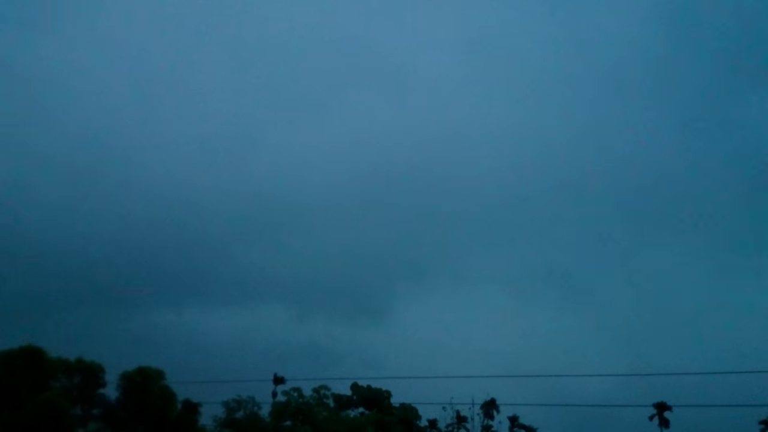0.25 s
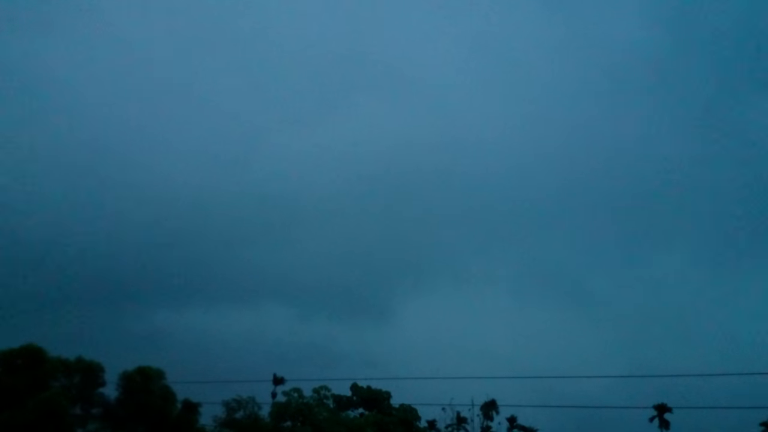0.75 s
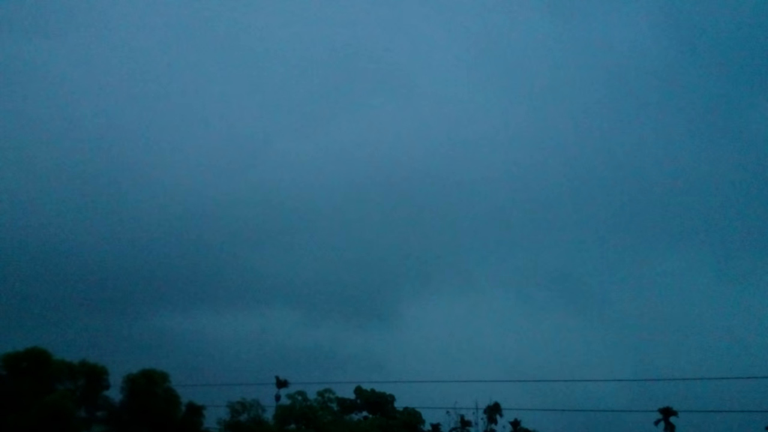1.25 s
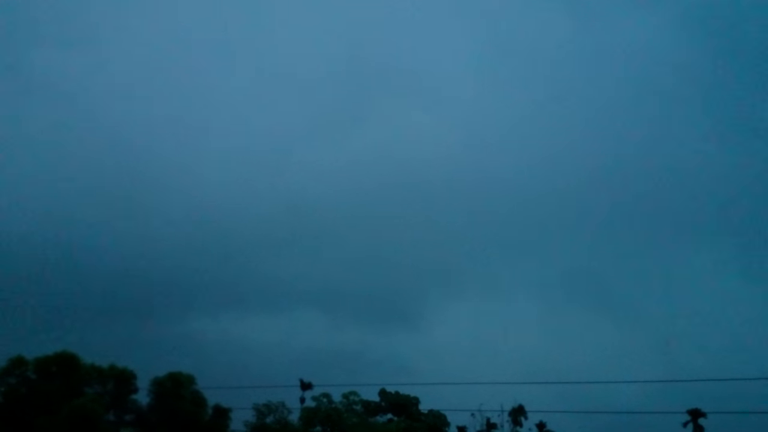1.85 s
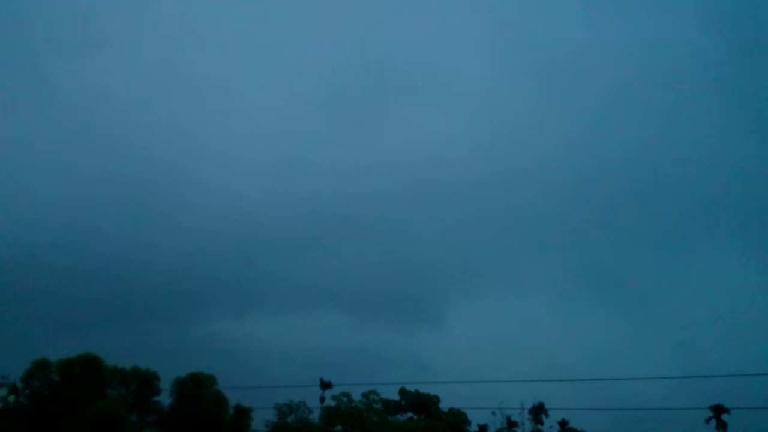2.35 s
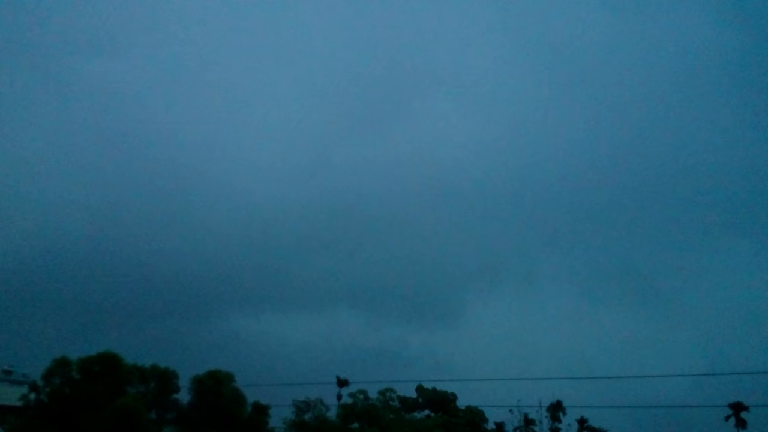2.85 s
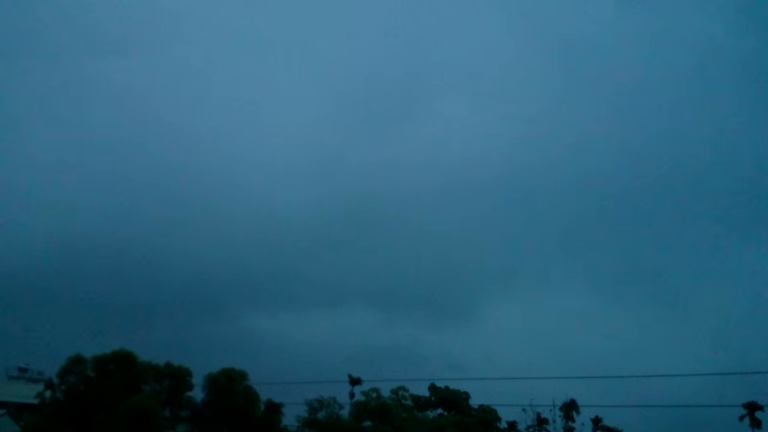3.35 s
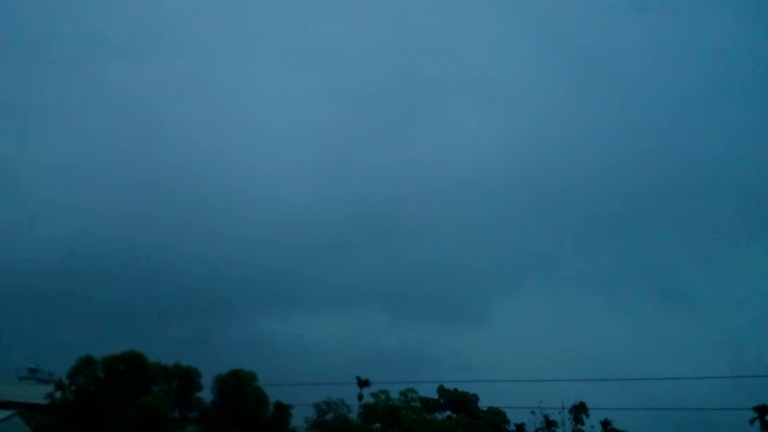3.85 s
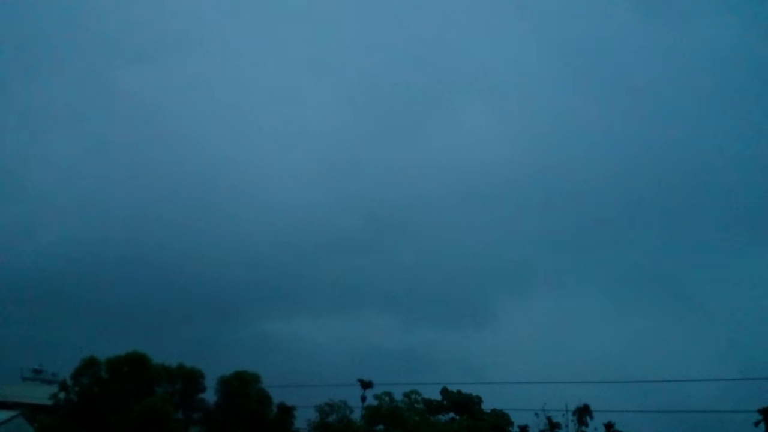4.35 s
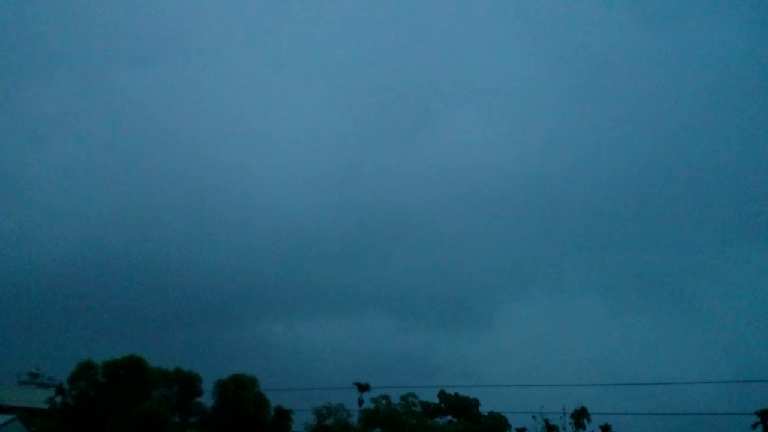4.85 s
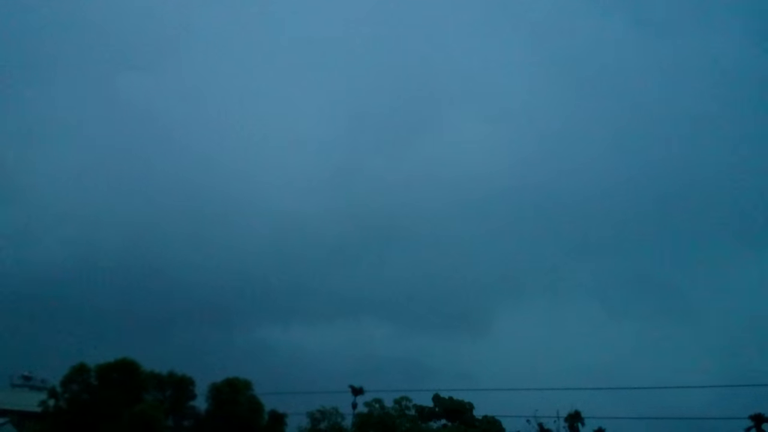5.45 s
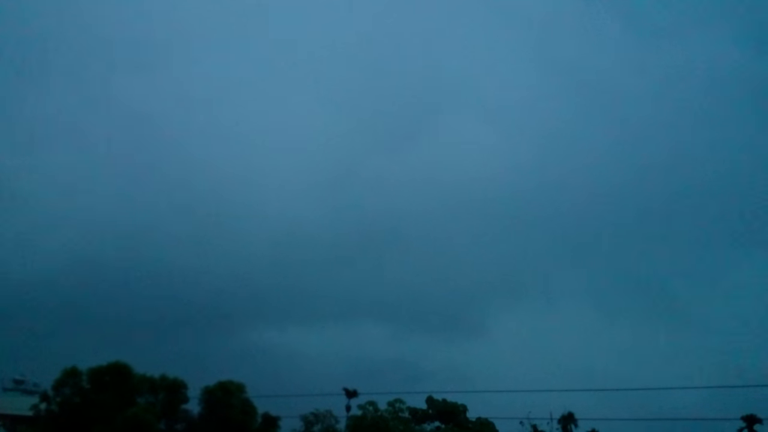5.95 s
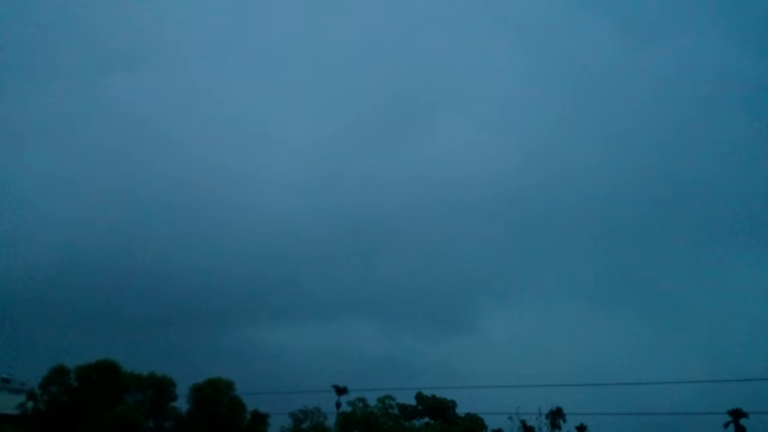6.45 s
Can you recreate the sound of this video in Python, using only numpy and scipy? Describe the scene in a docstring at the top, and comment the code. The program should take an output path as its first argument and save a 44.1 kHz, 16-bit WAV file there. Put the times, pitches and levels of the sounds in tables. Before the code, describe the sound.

Outdoors at dawn, a soft steady hiss of far traffic and leaves lies under several birds. One repeats a throbbing trilled note about every two and a half seconds; others give buzzy rising chirps, high falling slurs, small peeps and clear rising whistles. Low wind bumps hit mostly the right side of the microphone early and midway, and something rustles briefly close by.

```python
"""Birds at dawn in a yard

Far hiss, made of random short-time spectra, fills the air. Low noise and sinking thumps are wind
bumping mostly the right microphone port, and bursts of bright noise are something rustling close by.
The birds are warbling tones smeared by scattered echoes: some slide, chirp, flick, whistle and peep,
and one repeats a long trilled note."""
import sys
import numpy as np
from scipy import signal
from scipy.fft import rfft, irfft
from scipy.io import wavfile
from scipy.ndimage import uniform_filter1d

SR = 44100
rng = np.random.default_rng(int(sys.argv[2]) if len(sys.argv) > 2 else 0)


def inscribe(sig):
    """Save sig as 16-bit PCM at rate SR to the path in sys.argv[1].

    A 1-D sig is mono; a 2-D sig holds one channel per row.
    Samples are clipped to [-1, 1] before scaling.
    """
    pcm = np.round(np.clip(np.atleast_2d(sig).T, -1, 1) * 32767)
    wavfile.write(sys.argv[1], SR, pcm.astype(np.int16))


N = 296352  # length in samples

# Levels are set before the port colours; bird levels also come before echoes and faded edges.
# A positive left-right balance makes the left louder.

# Tone colour of the far hiss. Each row: pitch in Hz, relative level in dB.
HISS_COLOUR = [(30, -27), (100, -12.5), (200, -13), (400, -6), (720, -0.5), (950, -0.5), (1400, -2.5),
               (2100, -5.5), (3500, -4.5), (6000, -9.5), (9000, -17.5), (12000, -22), (15500, -22.5)]
# How alike the hiss is at the two ports. Each row: pitch in Hz, likeness from 0 to 1.
HISS_LIKENESS = [(60, 0.78), (300, 1), (600, 0.37), (1000, 0.27), (1500, 0.58), (2000, 0.25), (8000, .05)]
HISS_DB = -48.5
HISS_LEAD_S = 0.00035  # the shared hiss reaches the left port first

# Light breeze at the ports, before the shelter gains. Each row: time in seconds, level in dB.
BREEZE = [(0, -68), (.9, -78), (1.3, -77), (1.75, -85), (2.15, -82), (2.58, -68), (3.1, -73), (3.4, -77),
          (3.62, -71), (4.2, -72), (5, -80), (6.72, -79)]
# Gusts that bump the ports, before the shelter gains.
# Each row: peak time in seconds, peak level in dB, starting pitch in Hz before it sinks and wavers.
GUSTS = [(.075, -51.5, 110), (.155, -54, 70.2), (.265, -62, 80), (.365, -59, 110), (0.441, -48.5, 190),
         (.475, -52, 70), (.515, -56, 90), (.655, -58, 70), (.69, -59, 69.6), (.97, -62, 90),
         (1.12, -63, 80), (1.17, -64, 60), (2.39, -65, 90), (2.495, -57, 75), (2.62, -64, 70.2),
         (2.69, -57, 80), (2.755, -55, 79.7), (2.825, -58, 75), (2.984, -48, 100), (3.045, -57, 69.8),
         (3.522, -48.5, 150), (3.548, -47, 120.2), (3.59, -60, 70), (3.725, -57, 90), (3.805, -60, 70),
         (4.0, -53, 129), (4.055, -53.5, 70), (4.335, -64, 100), (5.84, -63, 70)]
# Tone colour of the noisy part of the wind. Each row: pitch in Hz, relative level in dB.
WIND_COLOUR = [(32, -38), (45, 2), (60, 4.5), (120, -8), (200, -5), (300, -18), (500, -47)]
GUST_RISE_DB_PER_S, GUST_FALL_DB_PER_S = 900, 502
GUST_LEAD_S, GUST_SINK_S = 0.014, 0.035  # pitch starts this early, then sinks with this time constant
GUST_LOW_HZ = 55.1  # pitch that the thumps sink towards
GUST_EDDIES_DB = -5  # noise of a gust compared with its thump

# Brushes nearby. Each row: peak time in seconds, peak level in dB, fading in dB per second.
RUSTLES = [(.032, -42, 90), (4.69, -44, 108), (4.775, -47.5, 110), (4.936, -53.5, 160)]
# Tone colour of the brushes. Each row: pitch in Hz, relative level in dB.
RUSTLE_COLOUR = [(1500, -15), (3000, 1.5), (5000, 5), (6500, 4), (8000, 1.5), (12000, -5.5), (15500, -9.5)]
RUSTLE_RISE_DB_PER_S = 230

# Short peeps of farther birds. Each row: start in seconds, glide in seconds, start pitch in Hz,
# end pitch in Hz, level in dB, left-right balance in dB.
PEEPS = [(.31, 0.014, 2730, 2640, -55.5, -2), (1.17, 0.055, 4740, 5000, -60.5, 2),
         (1.675, 0.032, 4500, 4570, -59, 5), (1.845, 0.046, 4200, 4600, -58, 4),
         (2.16, 0.017, 4350, 4150, -55, -2), (3.09, .02, 3500, 3600, -62, -4),
         (4.78, .02, 5900, 5800, -56, -3), (4.92, 0.04, 4480, 4970, -55.5, 1),
         (5.0, 0.022, 4660, 4400, -53.5, 0), (5.04, 0.02, 4600, 4790, -54, -2),
         (5.11, 0.028, 3810, 4190, -55, -3), (5.185, .012, 4000, 3944, -58, -2.5),
         (6.2, .022, 4170, 4320, -54, -2), (6.645, .01, 4500, 4640, -52, 3)]
PEEP_HELD_S = 0.018
# Clear rising whistles. Each row: start in seconds, level in dB, left-right balance in dB.
WHISTLES = [(.479, -59, 4), (.62, -58, 5), (4.605, -54, -4), (4.752, -52, 2), (4.892, -50, -1),
            (5.04, -50.5, -1), (5.185, -54.5, 0)]
# Shape of every whistle. The row: glide in seconds, held in seconds, start pitch in Hz, end pitch in Hz.
WHISTLE_SHAPE = (0.047, 0.015, 2980, 3710)
# Quick upward flicks that end a chirp. Each row: start in seconds, level in dB, left-right balance in dB.
FLICKS = [(2.906, -43.5, -4), (2.922, -50, 4), (5.945, -38, 1), (5.968, -40.5, 3)]
# Shape of every flick. The row: glide in seconds, held in seconds, start pitch in Hz, end pitch in Hz.
FLICK_SHAPE = (0.00852, 0.0021, 3200, 5400)
# Buzzy rising chirps. Each row: start in seconds, held in seconds, end pitch in Hz, level in dB,
# left-right balance in dB.
CHIRPS = [(1.06, 0.043, 3430, -43.5, -1), (1.1, 0.023, 3960, -48, 0), (2.828, .089, 3945, -43.5, -1.5),
          (3.54, 0.019, 3566, -41.5, 0.5), (3.575, 0.019, 4100, -49.5, 0), (5.3, 0.053, 3510, -47, 0),
          (5.315, .03, 3970, -44.5, -1.5), (5.868, 0.083, 3995, -40.5, 2.5)]
CHIRP_GLIDE_S, CHIRP_RISE_HZ = 0.0288, 241.6
# Buzzy falls that settle on a clearer note. Each row: start in seconds, glide in seconds,
# held in seconds, start pitch in Hz, end pitch in Hz, level in dB, left-right balance in dB.
SLIDES = [(.205, 0.027, .005, 6600, 5870, -61, 0), (.24, 0.041, .005, 5350, 4750, -61, -2),
          (.49, 0.085, .01, 5950, 4700, -62, 3), (.765, 0.084, 0.0089, 5640, 4390, -65.5, 0),
          (1.42, .095, .1, 5520, 4040, -59.5, 0.5), (1.799, .12, 0.0094, 5700, 4940, -62, 0),
          (2.0, 0.2, 0.045, 6240, 4300, -58.5, 1), (2.04, 0.073, 0.024, 5000, 3990, -54.5, 1),
          (2.28, 0.083, 0.034, 5890, 4000, -61.5, 2), (2.49, .12, 0.012, 6540, 5000, -57.5, -1.5),
          (3.855, 0.069, 0.034, 6290, 4250, -61.5, 5), (4.04, 0.065, .05, 5650, 4170, -63, 1),
          (4.3, 0.1, 0.097, 5930, 4250, -58.5, -1), (4.73, 0.054, 0.015, 6100, 4520, -50, 2),
          (4.77, 0.092, 0.024, 5980, 4060, -55.5, 4), (5.08, 0.074, 0.043, 5460, 4460, -58.5, 1),
          (5.278, 0.046, 0.012, 5330, 4550, -54.5, -1.5), (5.48, 0.025, 0.016, 4400, 3940, -54.5, -1),
          (5.46, .07, .02, 5340, 5050, -60.5, -1), (5.54, 0.135, 0.035, 6030, 3956, -53, -1),
          (5.56, 0.079, 0.013, 5500, 4590, -53, 0), (5.758, 0.074, 0.046, 6670, 4760, -50, 2.5),
          (6.22, 0.15, 0.04, 6200, 4024, -57.5, 8), (6.225, 0.091, 0.021, 5365, 4980, -58.5, -7),
          (6.29, 0.03, 0.0055, 6350, 5830, -53.5, -1), (6.55, 0.031, 0.0083, 5800, 4780, -53.5, 4)]
# Trilled notes. Each row: start in seconds, level in dB before the effort is added.
TRILLS = [(-.205, -42.5), (1.647, -42), (4.096, -43), (6.462, -39.5)]
# Every trilled note dips, arches and sinks into a buzz.
# Each row: seconds after its start, effort in dB, pitch in Hz, buzz from 0 to 1.
TRILL_SHAPE = [(0, -0.5, 3330, 0.5), (0.041, 2, 3293, 0.27), (.105, -2.5, 3247, 0.28),
               (0.319, -1.5, 3319, .28), (0.389, -3, 3231, 0.77), (.455, -2, 3227, 0.97),
               (.495, -9, 3208, 1), (.54, -6, 3215, .9)]
BIRD_LEAD = 17  # samples by which a bird's direct sound reaches the left port first

# Colour of the two microphone ports. Each row: pitch in Hz, left gain in dB, right gain in dB.
PORT_COLOUR = [(1880, 1, 1), (3930, -0.5, 3), (4310, -4.5, 4.5), (5190, -5, 10), (6090, 2.5, 3),
               (7100, 6, -1), (7680, 8.5, -14), (9080, 2.5, -2.5), (11750, -0.5, -3), (14000, -8, 6.5),
               (15500, 2, -6)]
EDGE_HZ = 15720  # the microphone passes little above this


def gain_of(db):
    """Turn decibels into a plain factor."""
    return 10 ** (np.asarray(db) / 20)


def evened(x):
    """Scale a sound to an rms of 1."""
    return x / np.sqrt(np.mean(x ** 2) + 1e-20)


def read(points, hz, column=1):
    """Read a table between its rows, along a logarithmic pitch scale."""
    table = np.transpose(points)
    return np.interp(np.log(hz + 1), np.log(table[0] + 1), table[column])


def coloured(x, points, column=1):
    """Make each pitch louder or softer as a table says."""
    level_db = read(points, np.fft.rfftfreq(len(x), 1 / SR), column)
    return irfft(rfft(x) * gain_of(level_db), len(x))


def wander(size, per_s):
    """Random drift of rms 1: smoothed noise that weakens above the rate per_s in Hz."""
    noise = uniform_filter1d(rng.standard_normal(size), 40)
    return evened(signal.lfilter([1], [1, -np.exp(-2 * np.pi * per_s / SR)], noise))


def swells(peak_s, peak_db, rise_db_per_s, fall_db_per_s):
    """Gain of several swells, each climbing and dying away at a steady dB rate; their powers add."""
    t = np.arange(0, N + 64, 64) / SR
    power = 0
    for s, db, fall in np.broadcast(peak_s, peak_db, fall_db_per_s):
        drop_db = np.where(t < s, rise_db_per_s * (s - t), fall * (t - s))
        power = power + gain_of(db - drop_db) ** 2
    return np.interp(np.arange(N) / SR, t, np.sqrt(power))


def add(mix, s, sound):
    """Lay a sound into the mix at its start time."""
    at = round(s * SR)
    sound = sound[:, max(-at, 0):]  # a sound may have begun before time zero
    part = mix[:, max(at, 0):][:, :sound.shape[1]]
    part += sound[:, :part.shape[1]]


def hiss():
    """Far traffic and leaves: random short-time spectra with faint patches, partly shared by the ports."""
    frames, hz = N // 256 + 5, np.fft.rfftfreq(1024, 1 / SR)
    a, b, c, d, patches = rng.standard_normal((frames, 513, 5)).T
    patches = uniform_filter1d(patches, 14, 0)  # smooth across pitch
    patches = evened(uniform_filter1d(patches, 16, 1))  # smooth along time
    same = np.clip(read(HISS_LIKENESS, hz), 0, 1)[:, None]
    left = a + 1j * b
    late = left * np.exp(-2j * np.pi * hz * HISS_LEAD_S)[:, None]
    right = same * late + np.sqrt(1 - same ** 2) * (c + 1j * d)
    spectra = np.array([left, right]) * gain_of(read(HISS_COLOUR, hz)[:, None] + 1.25 * patches)
    sound = signal.istft(spectra, nperseg=1024, noverlap=768)[1][:, :N]
    return gain_of(HISS_DB) * evened(sound)


def wind():
    """A lumpy low breeze of noise, and gusts that thump with a sinking pitch; the left port is sheltered."""
    s, db, start_hz = np.transpose(GUSTS)
    t = np.arange(N) / SR
    breeze = gain_of(np.interp(t, *np.transpose(BREEZE)) + 3 * wander(N, 4.5))  # lumps of 3 dB rms
    gusts = swells(s, db, GUST_RISE_DB_PER_S, GUST_FALL_DB_PER_S)
    # Noise and pitch wavering are drawn separately for each port.
    eddies = np.array([evened(coloured(rng.standard_normal(N), WIND_COLOUR)) * gain_of(1.6 * wander(N, 11.0))
                       for port in range(2)])
    last = np.clip(np.searchsorted(s - GUST_LEAD_S, t) - 1, 0, None)  # latest gust at each moment
    age = np.maximum(t - s[last] + GUST_LEAD_S, 0)
    pitch = GUST_LOW_HZ + (start_hz[last] - GUST_LOW_HZ) * np.exp(-age / GUST_SINK_S)
    wavering = 1 + 0.163 * np.array([wander(N, 30) for port in range(2)])
    turns = np.cumsum(pitch * wavering, axis=1) / SR + rng.random((2, 1))
    thump = np.sqrt(2) * np.sin(2 * np.pi * turns)
    noise = eddies * np.hypot(breeze, gusts * gain_of(GUST_EDDIES_DB))
    return (noise + thump * gusts) * gain_of([[-14], [4.5]])  # shelter gains, left and right


def rustle():
    """Something brushes close by: short swells of bright, slightly grainy noise."""
    s, db, fall_db_per_s = np.transpose(RUSTLES)
    grains = [rng.standard_normal(N) * gain_of(0.85 * wander(N, 200)) for port in range(2)]
    brushes = np.array([evened(coloured(g, RUSTLE_COLOUR)) for g in grains])
    return brushes * swells(s, db, RUSTLE_RISE_DB_PER_S, fall_db_per_s)


def echoed(call, pan_db, echo_db, t60):
    """Direct sound plus scattering from leaves and walls, which fades by 60 dB in t60 seconds."""
    # Sparse echoes, drawn anew for each call and port
    at = np.arange(100, SR // 2 - 20, 20) + rng.integers(0, 20, (2, (SR // 2 - 101) // 20))
    taps = np.zeros((2, SR // 2))
    np.put_along_axis(taps, at, rng.choice([-1., 1.], at.shape) * gain_of(-60 * at / SR / t60), 1)
    taps *= gain_of(echo_db) / np.linalg.norm(taps[0])
    taps[0, 0] = taps[1, BIRD_LEAD] = 1  # direct sound
    return signal.fftconvolve(call[None], taps, axes=1) * gain_of([[pan_db / 2], [-pan_db / 2]])


def syrinx(hz, warble_hz, warble_depth_hz, throb, rough_hz):
    """A bird's voice: a rotating phasor whose pitch and strength pulse together, with a trembling pitch."""
    warble_rate = warble_hz * (1 + 0.038 * wander(len(hz), 15.0))
    beat = 2 * np.pi * (np.cumsum(warble_rate) / SR + rng.random())
    pitch = hz + warble_depth_hz * np.sin(beat) + rough_hz * wander(len(hz), 140)
    return (1 + throb * np.cos(beat)) * np.exp(2j * np.pi * np.cumsum(pitch) / SR)


def sweeps(table, bend, voice, settled, edge, echo_db, t60):
    """Glides that level off on a held note, where only the share `settled` of the warble is left."""
    warble_hz, depth_hz, throb, rough_hz = voice
    out = np.zeros((2, N))
    for s, glide, held, start_hz, end_hz, db, pan_db in table:
        t = np.arange(0, glide + held, 1 / SR)
        left = np.clip(1 - t / glide, 0, 1)  # share of the glide still to come
        unrest = settled + (1 - settled) * np.minimum(4 * left, 1)
        hz = end_hz + (start_hz - end_hz) * left ** bend
        tone = syrinx(hz, warble_hz, depth_hz * unrest, throb * unrest, rough_hz * unrest)
        tone = tone + gain_of(-28) * (tone ** 2 + tone ** 3 / 2)  # faint overtones
        call = gain_of(db) * evened(tone.real) * signal.windows.tukey(len(t), edge)
        add(out, s, echoed(call, pan_db, echo_db, t60))
    return out


# Each voice below: warble in Hz, warble depth in Hz, throb from 0 to 1, tremble in Hz.

def peeps():
    """Farther birds: short, lightly warbling tones that glide a little."""
    rows = [(s, glide, PEEP_HELD_S, *rest) for s, glide, *rest in PEEPS]
    return sweeps(rows, 1.3, (90, 60, .4, 45), settled=.9, edge=.5, echo_db=3, t60=.3)


def whistles():
    """Clear rising tones with hardly any warble."""
    rows = [(s, *WHISTLE_SHAPE, db, pan) for s, db, pan in WHISTLES]
    return sweeps(rows, 1.3, (60, 5, .1, 15), settled=.9, edge=.4, echo_db=0, t60=.3)


def flicks():
    """Very quick upward glides with a rough pitch."""
    rows = [(s, *FLICK_SHAPE, db, pan) for s, db, pan in FLICKS]
    return sweeps(rows, 1.08, (72, 5, .05, 120), settled=0.81, edge=0.68, echo_db=2.5, t60=0.4)


def chirps():
    """Short rises made buzzy by a fast, deep warble."""
    rows = [(s, CHIRP_GLIDE_S, held, hz - CHIRP_RISE_HZ, hz, db, pan) for s, held, hz, db, pan in CHIRPS]
    return sweeps(rows, .6, (165, 190, .8, 90), settled=.6, edge=.55, echo_db=1, t60=.36)


def slides():
    """Falls made buzzy by a fast, deep warble that eases as each one settles."""
    return sweeps(SLIDES, 1.15, (125, 190, .8, 140), settled=.5, edge=.4, echo_db=5.5, t60=.35)


def trill(level_db):
    """A held note throbbing about 49 times a second, then taken over by a faster buzz with side tones."""
    s, *columns = np.transpose(TRILL_SHAPE)
    t = np.arange(0, s[-1], 1 / SR)
    effort_db, hz, buzz = (np.interp(t, s, c) for c in columns)
    flutter = np.exp(2j * np.pi * np.cumsum(170 + 12 * wander(len(t), 10.3)) / SR)
    side_tones = buzz / flutter + .33 * buzz * flutter  # the lower one is stronger
    voice = syrinx(hz, 49, 42, .8 - .6 * buzz, 14)
    note = evened((voice * (1 + side_tones)).real)
    call = note * gain_of(level_db + effort_db) * signal.windows.tukey(len(t), .06)
    return echoed(call, -.5, echo_db=1, t60=.33)


def birds():
    """All the singers together, from the farther peeps to the trilled notes."""
    out = peeps() + whistles() + flicks() + chirps() + slides()
    for start, level_db in TRILLS:
        add(out, start, trill(level_db))
    return out


def scene():
    """The background and the birds, added up at the two ports."""
    return hiss() + wind() + rustle() + birds()


def record(dry):
    """Each microphone port has its own treble colour; then a filter removes the highest treble."""
    ports = np.array([coloured(dry[0], PORT_COLOUR, column=1), coloured(dry[1], PORT_COLOUR, column=2)])
    low_pass = signal.firwin(511, EDGE_HZ, window=("kaiser", 9), fs=SR)
    return signal.oaconvolve(ports, low_pass[None], "same", axes=1)


dry = scene()
out = record(dry)
inscribe(out)
```